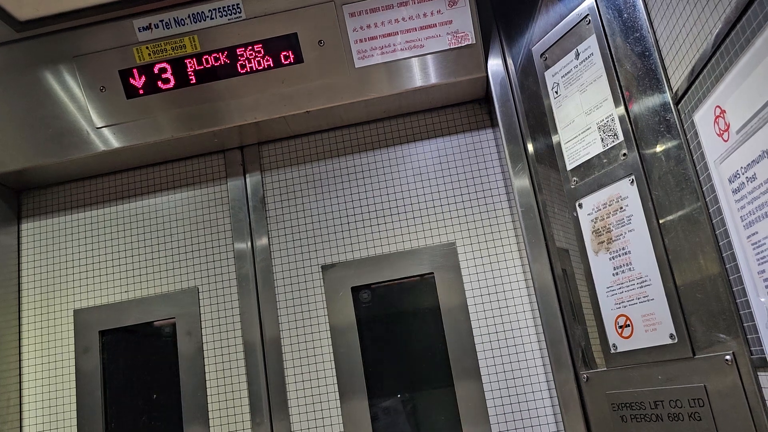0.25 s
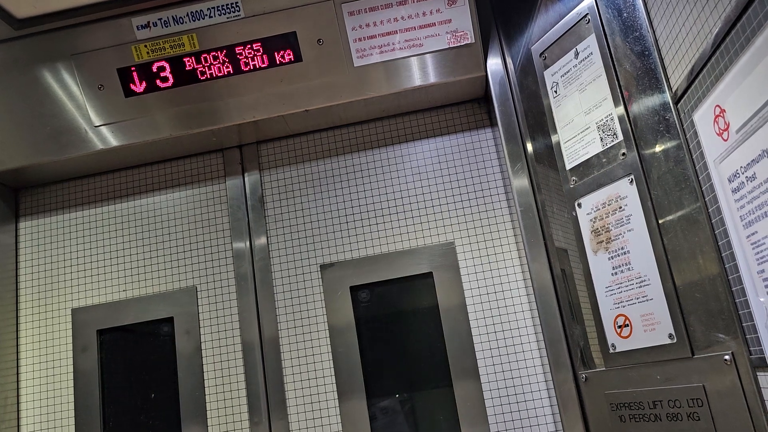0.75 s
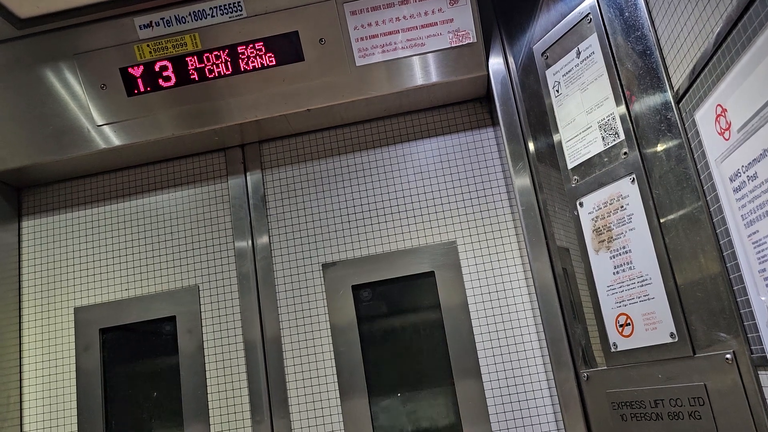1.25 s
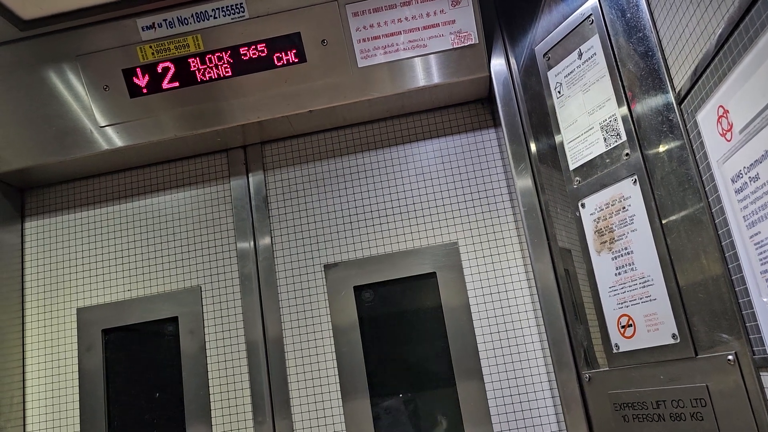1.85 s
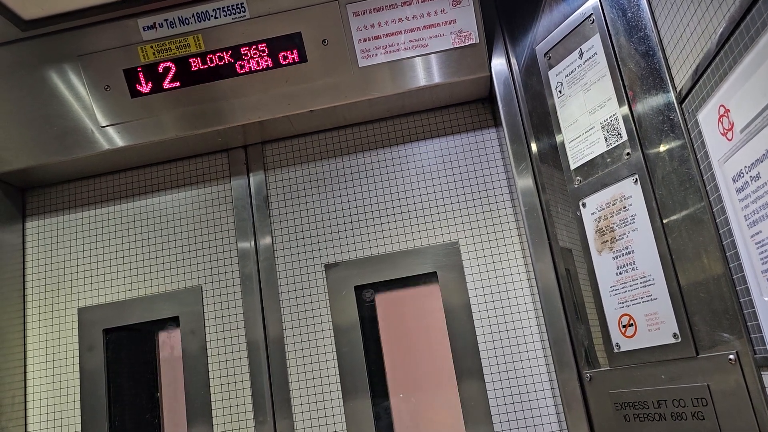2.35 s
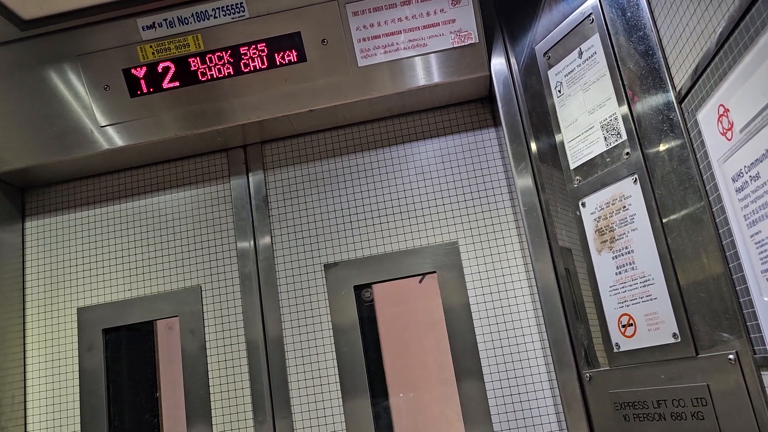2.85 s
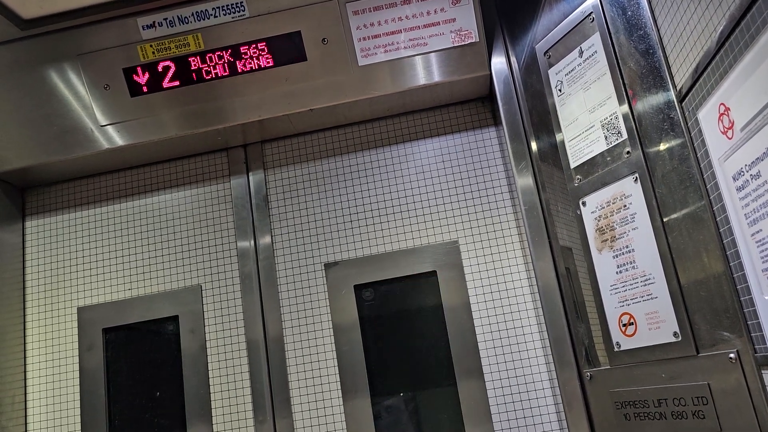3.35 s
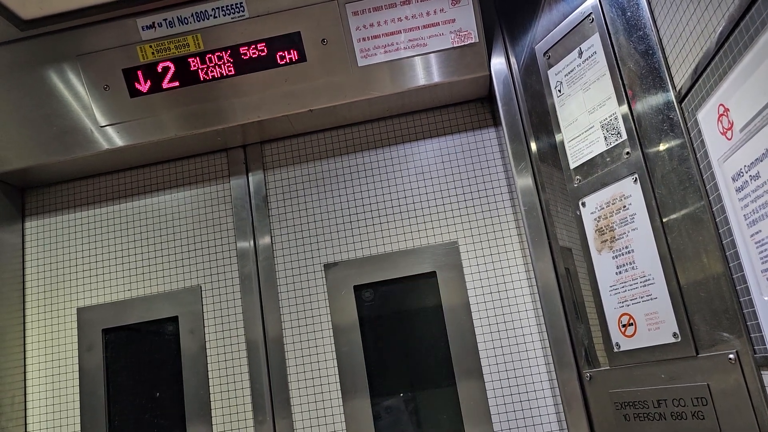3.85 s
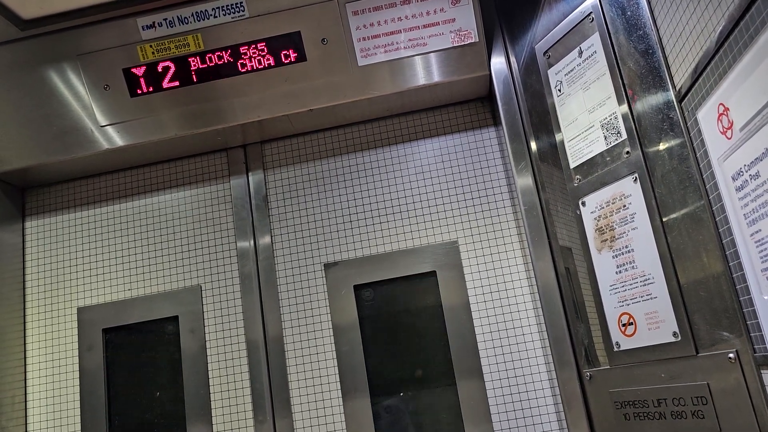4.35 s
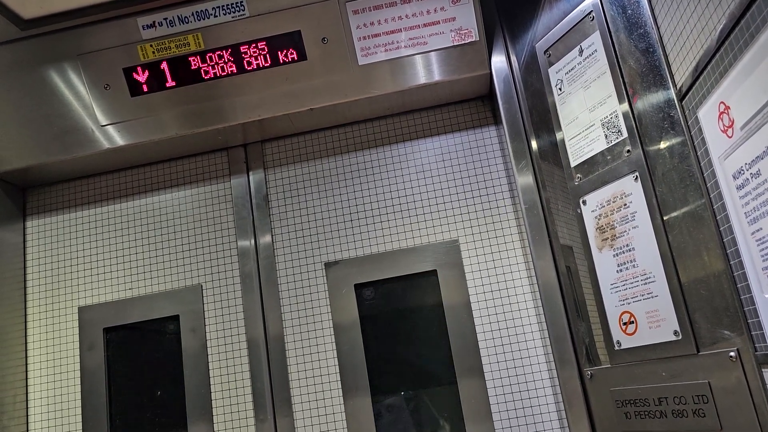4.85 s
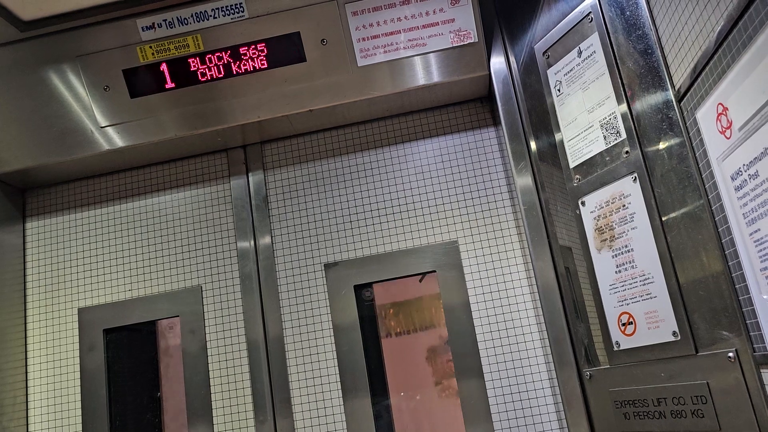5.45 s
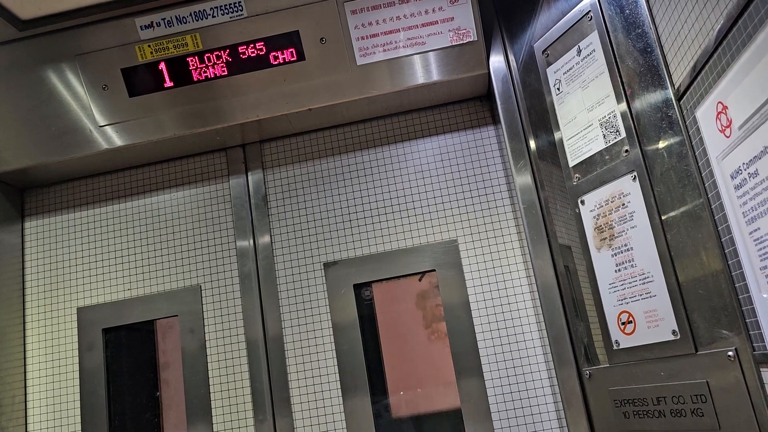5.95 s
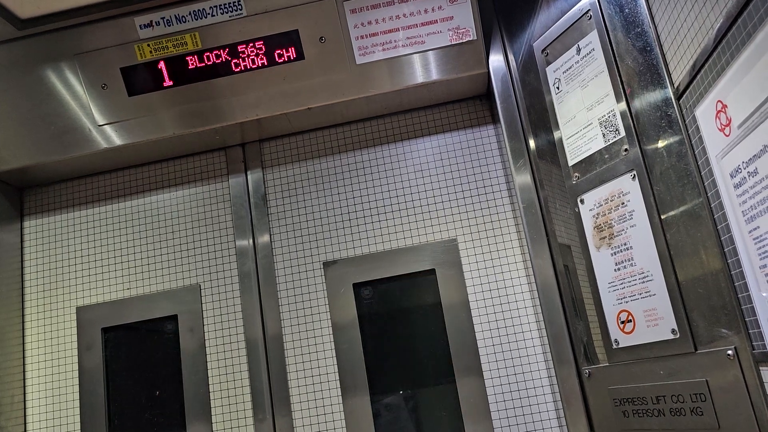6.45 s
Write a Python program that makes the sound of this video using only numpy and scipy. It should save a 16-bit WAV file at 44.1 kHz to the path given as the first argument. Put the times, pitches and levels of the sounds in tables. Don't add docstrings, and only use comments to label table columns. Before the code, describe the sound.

Inside a descending lift, a low throbbing hum and soft air rush run steadily, with two sharp clacks midway and a very faint squeal near the end.

```python
import sys
import numpy as np
from scipy import signal
from scipy.fft import rfft, irfft
from scipy.io import wavfile

SR = 44100
rng = np.random.default_rng(int(sys.argv[2]) if len(sys.argv) > 2 else 0)


def unload_audio(sound):
    columns = np.transpose(np.atleast_2d(sound))
    steps = np.round(np.clip(columns, -1, 1) * 32767)
    wavfile.write(sys.argv[1], SR, steps.astype(np.int16))


def gain_from_db(level_db):
    decades = np.asarray(level_db, float) / 20
    return 10 ** decades


N = 295470
T = np.arange(N) / SR

# t/s, first order/dB, second order/dB, frame ring/dB
DRIVE_LEVELS = [
    (0, -49.5, -46, -47.5),
    (1.1, -45, -46.5, -50),
    (2.2, -45.5, -41.5, -54),
    (2.8, -41.5, -43.5, -46),
    (3.6, -38.5, -38.5, -47),
    (4.5, -41.5, -39.5, -43.5),
    (5.8, -39.5, -36, -41),
    (6.7, -43, -35.5, -50.5),
]
FRAME_THROBS = [-.08, .58, 1.26, 1.88, 2.45, 2.93, 3.37, 4.04, 4.67, 5.32, 5.83, 6.26, 6.68, 7.2]
# multiple of the rotation rate, rms level/dB, wander/dB
FAN_ORDERS = [(1, -40.3, .7), (2, -48.9, .8), (4, -55, 1.5), (8, -59, 1.5), (9, -59.5, 2.0),
              (11, -62.5, 2.0), (12, -65, 2.5), (13, -70.5, 2.0)]
# multiple of the hum pitch, rms level/dB
HUM_HARMONICS = [(1, -41), (2, -55), (3, -67.5)]
# f/Hz, spectral level/dB per Hz
RUMBLE_SPECTRUM = [(12, -84), (17, -75), (21, -62), (36, -61), (48, -62), (62, -62), (68, -66), (76, -60),
                   (93, -59), (103, -71), (118, -76), (200, -84), (400, -110), (1000, -160)]
# f/Hz, left level/dB per Hz, right level/dB per Hz, left-right correlation
AIR_SPECTRUM = [(100, -84.5, -79, 0.88), (230, -82, -76.5, 0.78), (400, -79, -80, 0.64),
                (934, -84, -85.5, -0.23), (1400, -88, -83.5, -0.049), (1910, -91, -90, -0.35),
                (2420, -97, -96, 0.28), (3100, -96, -97.5, 0.12), (3440, -101, -101, -0.19),
                (4480, -106, -102, -0.076), (5150, -116, -121, 0.84), (6300, -124, -130, -0.64),
                (9150, -132, -134, -0.97), (11800, -128, -130, -0.69)]
# f/Hz, left level/dB per Hz, right level/dB per Hz, right lead/rad
CAR_MODES = [(129, -65, -67, 0.1), (151, -60, -60, 0.0), (172, -68, -68, 0.1), (212, -64, -64, 0.0),
             (250, -69, -69, 0.0), (269, -68, -68, 0.0), (301, -74, -68, 2.4), (314, -74, -72, 0.1),
             (377, -75, -73, -0.3), (457, -74, -72, -0.2), (519, -72, -80, 0.1), (549, -78, -78, -0.3),
             (592, -80, -79, 0.1), (608, -77, -79, -0.2), (700, -82, -78, -2.0), (748, -78, -78, 0.2),
             (796, -77, -77, 0.0), (845, -80, -80, -2.8), (888, -83, -76, -0.4), (920, -79, -80, -2.0),
             (1001, -86, -80, 0.2), (1040, -82, -82, -0.1), (1095, -88, -83, 0.7), (1157, -86, -83, -3.0),
             (1232, -82, -82, 1.6), (1372, -83, -79, -2.6), (1515, -84, -83, -2.8), (1588, -88, -83, 0.5),
             (1620, -86, -85, 0.2), (1682, -86, -83, 3.0)]
# t/s, thud level below 2 kHz/dB, ring level/dB, fizz level above 7 kHz/dB
SNAP_EVENTS = [
    (1.565, -23, -33.5, -11.5),
    (2.647, 3, -1, -0.5),
    (2.943, -4, -5, -3),
    (5.575, -37, -38, -28),
]
# f/Hz, left level/dB per Hz, right level/dB per Hz, t60/s
SNAP_SPECTRUM = [(98, -81.5, -75, 0.96), (176, -59.5, -60.5, 0.61), (495, -83, -77, 0.48),
                 (1180, -83.5, -83.5, 0.3), (2260, -84.5, -82.5, 0.46), (3360, -76, -79, 0.4),
                 (4430, -90, -84, 0.41), (5300, -89.5, -96, 0.39), (7000, -97, -110, 0.27),
                 (8100, -95.5, -103, 0.24), (10200, -105, -108, 0.2), (10600, -101.5, -99, 0.24),
                 (13800, -102, -109, .24), (15700, -105, -112, .24)]
# f/Hz, width/Hz, level/dB over the burst
HOUSING_MODES = [(2100, 110, 5), (2330, 90, -7), (2700, 200, 4), (3160, 150, 5), (3350, 70, -3),
                 (3550, 170, 6), (4430, 120, 5), (5400, 150, 5), (7750, 300, 4), (9200, 500, -8),
                 (11400, 300, 4)]
# f/Hz, rise/s
SNAP_RISE_TIMES = [(200, .03), (2200, .016), (2900, .0028)]
# start t/s, length/s, rms level/dB, left minus right/dB
SHOE_SLIPS = [(5.605, 0.123, -69.5, -5.5), (5.748, 0.055, -71, 0.5), (5.806, 0.049, -68, -1.5),
              (5.898, 0.031, -78, -2.0), (5.93, 0.083, -64, 1.0), (6.026, 0.047, -72, 0.0),
              (6.082, 0.143, -70, 1.5), (6.24, 0.065, -65, 0), (6.376, 0.053, -69.5, -2.0),
              (6.441, 0.035, -75, 4.5), (6.483, 0.045, -71, 9), (6.539, 0.043, -75, 9),
              (6.583, 0.073, -74, 4), (6.665, 0.043, -76, -5)]

DRIVE_HZ, FAN_HZ, MAINS_HUM_HZ = 29.39, 22.77, 99.96
FAN_CREST_S = -.0043
RIGHT_LEAD_S = .0002
PORT_HZ, PORT_WIDTH_HZ, PORT_DB = 11450, 700, 5.0
CROWD_WIDTH_HZ, CROWD_DB = 22, 2.6
MODE_LOSS, NARROWEST_HZ, WIDEST_HZ = .028, 8, 24
SHAFT_FLUTTER_S, FLUTTER_DB = .018, 2.5
SQUEAL_HZ, SQUEAL_WANDER_HZ = 2675, 10.0
SLIP_EDGE_S = 0.02
OPEN_S = .0001


def at_hz(table, hz, axis=1):
    rows = np.array(table, float)
    return np.interp(np.log(np.maximum(hz, 1)), np.log(rows[:, 0]), rows[:, axis])


def in_time(rows):
    s, *columns = np.transpose(rows)
    return [np.interp(T, s, c) for c in columns]


def white(*shape):
    return rng.standard_normal(shape) * np.sqrt(SR / 2)


def drift(rate):
    r = np.exp(-128 * np.pi * rate / SR)
    steps = rng.standard_normal(N // 64 + 2002)
    slow = signal.lfilter([1], [1, -2 * r, r * r], steps)[2000:]
    return np.interp(np.arange(N) / 64, np.arange(len(slow)), slow / slow.std())


def resonate(x, hz, width_hz):
    r = np.exp(-np.pi * width_hz / SR)
    zeros = np.array([1, 0, -1]) * (1 - r * r) / 2
    poles = [1, -2 * r * np.cos(2 * np.pi * hz / SR), r * r]
    return signal.lfilter(zeros, poles, x)


def tone(hz, level_db, crest_s=0):
    return np.sqrt(2) * gain_from_db(level_db) * np.cos(2 * np.pi * hz * (T - crest_s))


def hoist_drive(first_db, second_db):
    return tone(DRIVE_HZ, first_db) + tone(2 * DRIVE_HZ, second_db)


def car_frame(frame_db):
    gained = np.interp(T, FRAME_THROBS, np.arange(len(FRAME_THROBS)))
    return tone(2 * DRIVE_HZ, frame_db, -gained / (2 * DRIVE_HZ))


def ceiling_fan():
    return sum(tone(k * FAN_HZ, db + wander_db * drift(1.5), FAN_CREST_S) for k, db, wander_db in FAN_ORDERS)


def mains_hum():
    return sum(tone(k * MAINS_HUM_HZ, db) for k, db in HUM_HARMONICS)


def rumble():
    hz = np.fft.rfftfreq(N, 1 / SR)
    return irfft(rfft(white(N)) * gain_from_db(at_hz(RUMBLE_SPECTRUM, hz)), N)


def crowded_modes(hz):
    ripple = rng.standard_normal((2, round(SR / 2 / CROWD_WIDTH_HZ) + 1))
    depth_db = CROWD_DB * np.clip(hz / 1200, 0, 1)
    return gain_from_db([depth_db * np.interp(hz / CROWD_WIDTH_HZ, np.arange(len(r)), r) for r in ripple])


def air():
    hz = np.fft.rfftfreq(N, 1 / SR)
    port = gain_from_db(PORT_DB / (1 + (2 * (hz - PORT_HZ) / PORT_WIDTH_HZ) ** 2))
    mid, side = rfft(white(2, N))
    alike = np.clip(at_hz(AIR_SPECTRUM, hz, axis=3), -1, 1)
    shared = np.sqrt((1 + alike) / 2) * mid
    apart = np.sqrt((1 - alike) / 2) * side
    left = gain_from_db(at_hz(AIR_SPECTRUM, hz, axis=1)) * (shared + apart)
    right = gain_from_db(at_hz(AIR_SPECTRUM, hz, axis=2)) * (shared - apart)
    return irfft(np.array([left, right]) * crowded_modes(hz) * port * (hz > 60), N)


def standing_waves(sharp=0.49, low_db=1.5, high_db=-3.0):
    out, run_in = np.zeros((2, N)), SR // 4
    drive = white(2, N + 2 * run_in)
    for k, (hz, left_db, right_db, lead) in enumerate(CAR_MODES):
        width_hz = np.clip(MODE_LOSS * hz, NARROWEST_HZ, WIDEST_HZ)
        noise = np.roll(drive[k % 2], 9001 * k)
        mode = resonate(resonate(noise, hz, width_hz), hz, width_hz / sharp)
        trim_db = at_hz([(300, low_db), (1000, high_db)], hz)
        ahead = run_in + round(lead / (2 * np.pi * hz) * SR)
        out[0] += gain_from_db(left_db + trim_db) * mode[run_in:run_in + N]
        out[1] += gain_from_db(right_db + trim_db) * mode[ahead:ahead + N]
    return out


def snaps(hold_s=.035, crack_db=3.0, crack_s=.007):
    out, size = np.zeros((2, N)), SR // 2
    t, hz = np.arange(size) / SR, np.fft.rfftfreq(size, 1 / SR)
    swing = np.cos(2 * np.pi * (t - .005) / SHAFT_FLUTTER_S)
    flutter = gain_from_db(FLUTTER_DB * swing * np.exp(-t / 0.066))
    housing = gain_from_db(sum(db / (1 + (2 * (hz - at) / width) ** 2) for at, width, db in HOUSING_MODES))
    crack = gain_from_db(crack_db * np.exp(-t / crack_s))
    spectrum = gain_from_db([at_hz(SNAP_SPECTRUM, hz, axis=1), at_hz(SNAP_SPECTRUM, hz, axis=2)])
    centres = np.geomspace(110, 16500, 22)
    for s, thud_db, ring_db, fizz_db in SNAP_EVENTS:
        noise = rfft(white(2, size))
        noise[1] = np.where(hz < 400, noise[0], noise[1])
        gain = gain_from_db(at_hz([(2000, thud_db), (2600, ring_db), (5600, ring_db), (7200, fizz_db)], hz))
        noise *= gain * housing * spectrum
        burst = 0
        for k, centre in enumerate(centres):
            this_band = np.arange(len(centres)) == k
            band = np.interp(np.log(hz + 1), np.log(centres), this_band, left=0, right=0)
            rise = 1 - np.exp(-(t / at_hz(SNAP_RISE_TIMES, centre)) ** 2)
            fall = gain_from_db(-60 * np.maximum(t - hold_s, 0) / at_hz(SNAP_SPECTRUM, centre, axis=3))
            burst = burst + irfft(noise * band, size) * rise * fall
        at = round(s * SR)
        out[:, at:at + size] += burst * flutter * crack
    return out


def squeal(side_db=1.5, flicker_db=2.7, slip_db=4.0, drag_db=-83.5):
    phase = 2 * np.pi * np.cumsum(SQUEAL_HZ + SQUEAL_WANDER_HZ * drift(14)) / SR
    beads = gain_from_db(drag_db) * (T > SHOE_SLIPS[0][0])
    for s, length, db, pan_db in SHOE_SLIPS:
        level = gain_from_db(db + np.array([[pan_db], [-pan_db]]) / 2)
        to_edge = np.minimum(T - s, s + length - T)
        beads = beads + level * np.clip(to_edge / SLIP_EDGE_S + .5, 0, 1)
    grip = gain_from_db(side_db + slip_db * np.clip(drift(45), -3, 1))
    ports = [gain_from_db(flicker_db * drift(8)) * np.cos(phase + turn) for turn in (0, 1.6)]
    return beads * grip * np.sqrt(2) * np.array(ports)


def scene():
    first_db, second_db, frame_db = in_time(DRIVE_LEVELS)
    bass = hoist_drive(first_db, second_db) + car_frame(frame_db) + ceiling_fan() + mains_hum() + rumble()
    ahead = bass + RIGHT_LEAD_S * SR * np.gradient(bass)
    bass = np.array([gain_from_db(.2) * bass, gain_from_db(-.2) * ahead])
    return bass + air() + standing_waves() + snaps() + squeal()


def band_limit(x):
    return signal.sosfilt(signal.butter(12, 15720, fs=SR, output="sos"), x)


def record(dry):
    to_edge = np.minimum(T, T[-1] - T)
    gate = np.sin(np.pi / 2 * np.clip(to_edge / OPEN_S, 0, 1)) ** 2
    return band_limit(dry * gate)


dry = scene()
out = record(dry)
unload_audio(out)
```